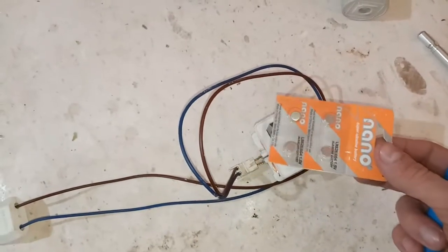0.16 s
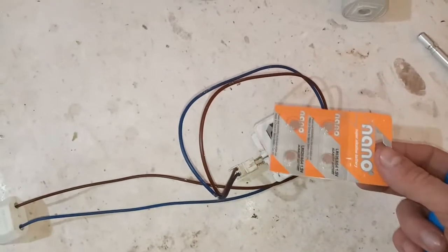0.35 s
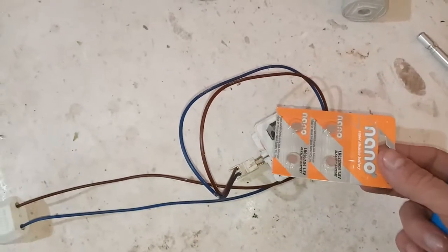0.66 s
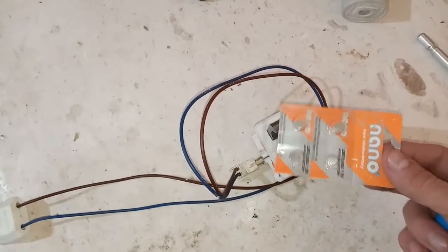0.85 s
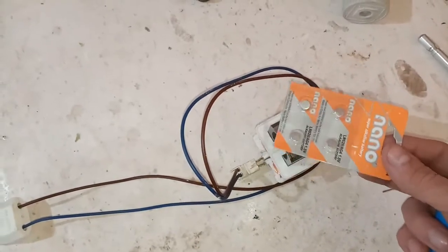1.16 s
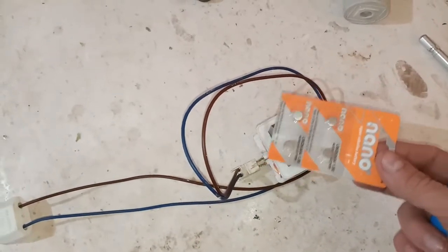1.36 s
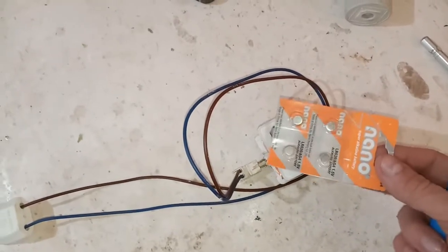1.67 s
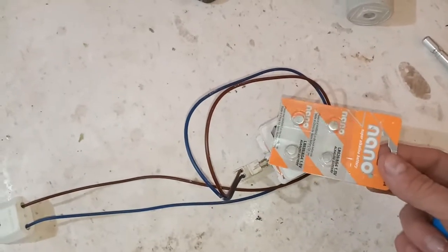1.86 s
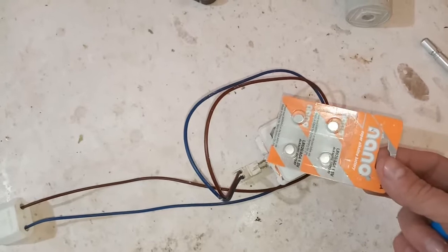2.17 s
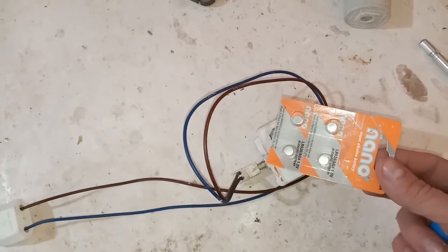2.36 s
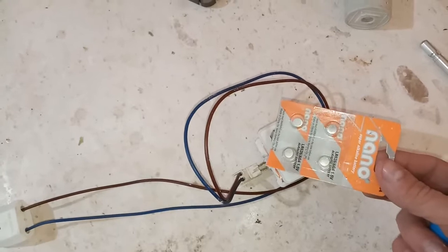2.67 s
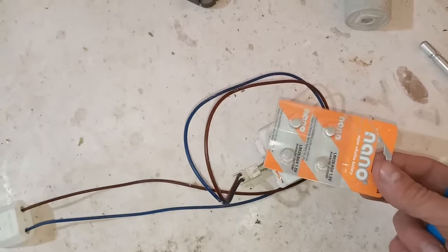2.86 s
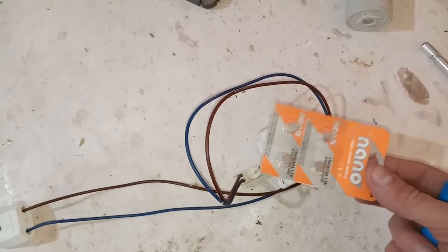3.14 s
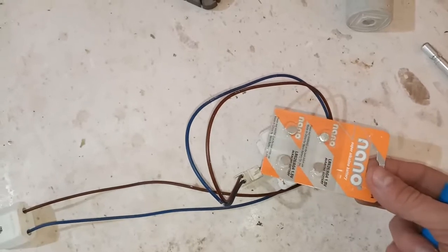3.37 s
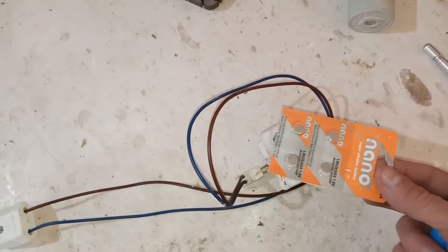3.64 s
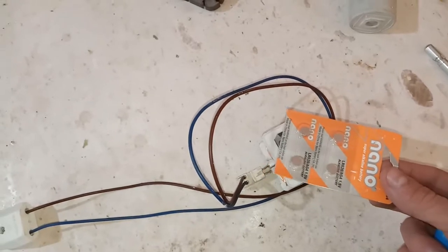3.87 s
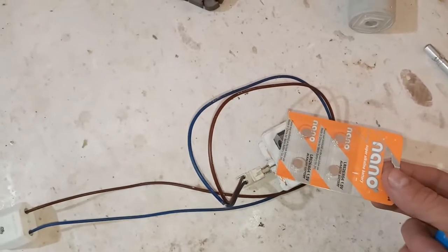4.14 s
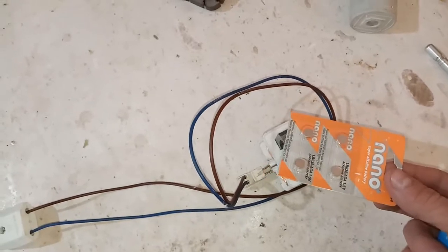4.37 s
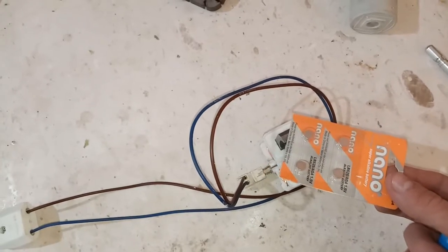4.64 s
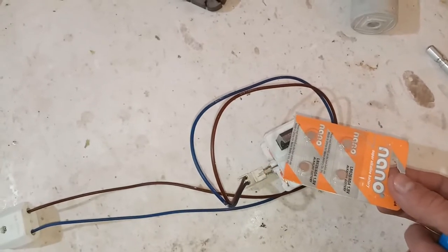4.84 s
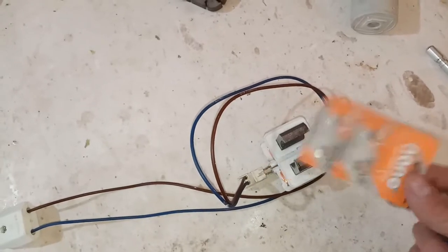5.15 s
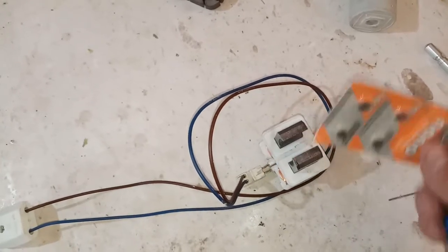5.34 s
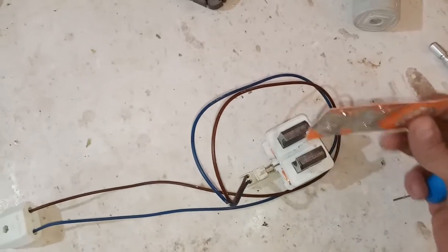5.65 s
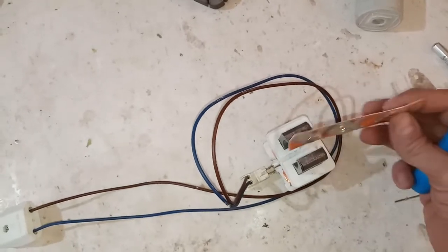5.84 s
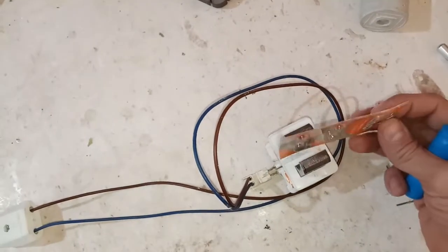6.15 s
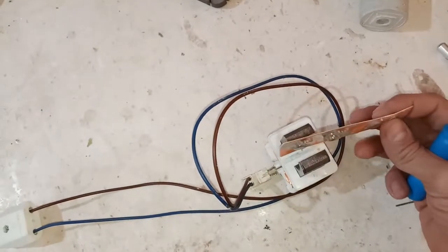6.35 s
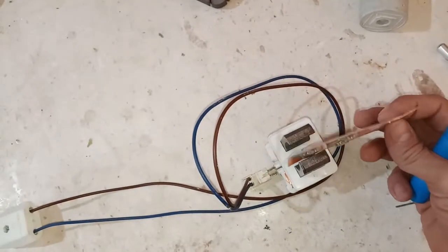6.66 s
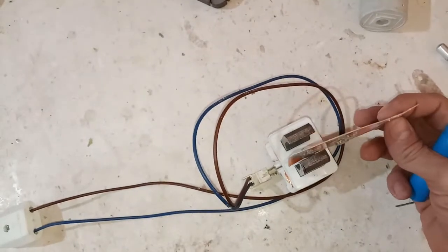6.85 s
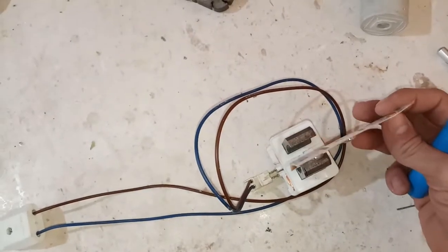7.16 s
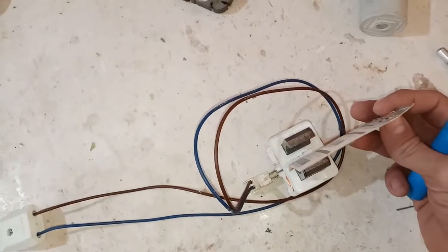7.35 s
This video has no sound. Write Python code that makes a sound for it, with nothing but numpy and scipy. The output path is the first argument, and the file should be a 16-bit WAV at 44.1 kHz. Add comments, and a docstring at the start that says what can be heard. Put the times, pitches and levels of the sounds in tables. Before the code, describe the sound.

Hard, fast electric rattling of a flat pack on a magnet core, broken by brief gaps, then near-quiet, a snap and a thinner steady buzz.

```python
"""A hard rattle, 100 slaps a second: a card pack with thin steel in it lies flat on a mains electromagnet.
Each tug of the field brings a slap on the core and bright ticks, ringing modes of pack and magnet.
It is lifted away, brushes the core, snaps onto it and then buzzes more thinly on its edge.
Contacts are short pushes with noisy flutter, filtered by resonances; hum and flexing add harmonics.
Behind lie small-room reflections, a thud of magnet and bench, a dull rumble and faint hiss."""
import sys
import numpy as np
from scipy import signal
from scipy.fft import rfft, irfft
from scipy.io import wavfile
from scipy.ndimage import uniform_filter1d

SR = 44100
rng = np.random.default_rng(int(sys.argv[2]) if len(sys.argv) > 2 else 0)


def transcribe(signal):
    """Save signal, clipped to [-1, 1], as a 16-bit WAV file at the path in sys.argv[1]."""
    frames = np.atleast_2d(signal).T
    limited = np.clip(frames, -1, 1)
    pcm = np.round(limited * 32767).astype(np.int16)
    wavfile.write(sys.argv[1], SR, pcm)


N = 331191

PULL_HZ = 100  # tugs of the field per second
TIME = np.arange(N) / SR  # s
BINS = np.fft.rfftfreq(8192, 1 / SR)  # Hz

# Ringing of the pack and the magnet: [f/Hz, width/Hz, lift/dB]
BODY_MODES = [(292, 11, 13), (602, 15.5, 7.5), (686.5, 29, 11.5), (1143, 37, 4), (1305, 110, 2.5),
              (1828, 12, 6), (2730, 170, 6.5), (3240, 93, 3), (4003, 30, 5), (6650, 130, 5),
              (7310, 110, 5.5), (8870, 72, 7), (10060, 140, -5)]
# Colour of one flat contact: [f/Hz, level/dB]
FLAT_COLOUR = [(100, -41), (230, -29.5), (380, -16.5), (480, -13.5), (650, -10.5), (850, -6.5),
               (1150, -0.5), (1750, 3.5), (2300, -5.5), (2550, -10), (3000, -5), (3600, 1), (4100, -2.5),
               (4400, -7.5), (5300, -9), (5750, -3), (7400, -5), (8100, -6.5), (10200, -12.5), (12800, -31),
               (16000, -36.5)]
# Two main resonances of the flat pack, shifting as it is pressed and bent:
# [t/s, lower f/Hz, upper f/Hz, gain of the upper/dB]
FLAT_RESONANCES = [(0.0, 1590, 6640, -9), (0.25, 1670, 7140, -7), (0.65, 1850, 6500, -21.5),
                   (1.35, 1840, 6950, -2), (1.6, 1660, 6800, 4), (2.0, 1680, 6500, -13),
                   (2.351, 1680, 6770, -6), (2.69, 1830, 7000, -19), (3.501, 1720, 6300, -11.5),
                   (3.92, 1600, 6700, -17.5), (4.22, 1750, 6700, 12), (4.55, 1660, 6400, 2),
                   (5.051, 1630, 5800, 1)]
# Resonances that ring only while the pack lies in one way: [start t/s, end t/s, f/Hz, gain/dB]
LYING_RESONANCES = [(0.049, 0.62, 3640, 1), (1.903, 2.7, 4850, -3), (3.75, 4.12, 9200, -10.5)]
# The pack is lowered onto the core and eased off, one curve per pass: [t/s, slap level/dB]
FLAT_PASSES = [
    [(0.0, -35), (0.032, -32), (0.588, -32.5), (0.616, -33.5), (0.652, -37), (0.66, -34.5), (0.85, -43.5)],
    [(0.87, -32), (0.872, -31.5), (1.004, -35.5), (1.088, -37), (1.222, -31.5), (1.326, -33.5), (1.6, -45)],
    [(1.68, -43), (1.752, -35.5), (1.94, -31), (1.944, -33.5), (1.982, -33.5), (2.492, -32), (2.5, -32)],
    [(2.52, -38.5), (2.55, -33.5), (2.69, -43), (2.7, -33.5), (2.72, -38), (2.74, -54)],
    [(2.98, -73), (3.048, -31), (3.07, -72), (3.084, -38.5), (3.192, -38.5), (3.264, -44.5), (3.345, -44)],
    [(3.37, -36), (3.464, -36.5), (3.78, -30.5), (3.984, -31), (4.06, -33.5), (4.552, -34.5), (4.69, -46)],
]
# Pulled away, the pack is caught again in short bursts: [start t/s, end t/s, slap level/dB]
CATCHES = [(4.738, 4.832, -40.5), (4.827, 4.825, -45.5), (4.886, 4.924, -39), (4.995, 5.003, -38.5)]
# Relative treble of the flat rattle: [t/s, chatter level/dB, finest ticks level/dB]
FLAT_TREBLE = [(0, -2.5, -2.5), (.5, -1.5, 0.5), (.7, -1.5, -7.5), (.92, -2.5, 2), (1.1, -4, -6),
               (1.27, -2.5, 2), (1.4, -3.5, -8), (1.65, 4, -1), (1.77, -4.5, -3.5), (2.08, -3, 3),
               (2.35, -6.5, -2.5), (2.75, 4, 8), (2.95, -7, -7.5), (3.28, -6.5, -11), (3.45, 0, -6),
               (3.801, -3.5, 0.5), (4.12, 1, 2.5), (4.55, 0, -6), (4.7, -2.5, -6.5)]
# The low end of the flat rattle thins or thickens for a while: [start t/s, end t/s, change/dB]
LOW_END_CHANGES = [(1.556, 1.68, -5), (2.956, 3.358, -17), (4.686, 4.757, 2.5)]
# Harder contacts are brighter; rows are heavy low end, slap, clack, chatter, finest ticks:
# [level re the slap level at the usual force/dB, gain per dB of slap level/dB]
FLAT_BRIGHTNESS = [(-15, 1.02), (-2.22, 1), (-6, 1.28), (1, 1.5), (-10, 1.27)]


def flat_rattle(clack_share=0.32, locked_ms=0.31):
    """Forced impact oscillation: each pull brings a slap, a loose corner's touch just before it,
    and a bright tick at its own delay."""
    slap_ms, rebound_ms, scatter_ms = swing()
    corner_ms = slap_ms - 2.1  # the loose corner touches first
    slap = strikes(slap_ms, scatter_ms, uneven_db=1.4, flutter=1.6, decay_ms=.9, rise_ms=.5)
    rebound = strikes(rebound_ms, scatter_ms + .1, uneven_db=2.2, flutter=1.5, decay_ms=.7, rise_ms=.5)
    loose = strikes(corner_ms, scatter_ms + 1.1, uneven_db=4, flutter=1.8, decay_ms=.8, rise_ms=.4)
    pull_s = np.arange(len(scatter_ms)) / PULL_HZ
    looseness = np.interp(TIME, pull_s, np.clip(scatter_ms / locked_ms, 0, 1))
    loose = amp(2.5) * loose * looseness  # a firmly locked pack chatters less

    lower_hz, upper_hz, upper_db = curves(FLAT_RESONANCES)
    slaps = slap + amp(-8) * rebound + amp(-6) * loose
    lower_gain = amp(-11 + 4 * waver(15))
    slaps = slaps + lower_gain * resonate(slaps, lower_hz + 70 * waver(15), width=160)

    chatter = rebound + amp(-6) * slap + amp(-5) * loose
    chatter = chatter + amp(upper_db) * resonate(chatter, upper_hz, width=1600)
    lying = np.zeros(N)
    for start, end, hz, db in LYING_RESONANCES:
        lying += amp(db) * during(start, end, fade_s=0.16) * resonate(chatter, np.full(N, hz), width=520)
    chatter = chatter + lying
    ticks = rebound + amp(-3) * slap + loose

    force = level(*np.vstack(FLAT_PASSES).T, fade=0.084)
    force = force + sum(burst(*row, rise_s=0.019, fall_db_per_s=321) for row in CATCHES)
    chatter_db, ticks_db = curves(FLAT_TREBLE)
    heavy_db = sum(db * during(start, end, fade_s=0.055) for start, end, db in LOW_END_CHANGES)
    colour_db = [heavy_db, 0, clack_share * chatter_db, chatter_db, ticks_db]
    gain = body(FLAT_COLOUR, BODY_MODES)
    return radiate(slaps, chatter, ticks, force, FLAT_BRIGHTNESS, -35, colour_db, gain, heavy_hz=890)


# Colour of one edge contact: [f/Hz, level/dB]
EDGE_COLOUR = [(40, -86), (100, -21), (300, -13), (650, -16), (930, -15.5), (1150, 4), (1550, 4),
               (2000, 6.5), (3200, -5.5), (4300, -0.5), (5200, -1), (6800, 2), (10000, -5.5), (13000, -29)]
# Two resonances of the pack on its edge, shifting with the grip: [t/s, lower f/Hz, upper f/Hz]
EDGE_RESONANCES = [(5.7, 1160, 2000), (5.88, 1250, 2100), (6.06, 1310, 2100), (6.2, 1390, 2150),
                   (6.34, 1295, 2150), (6.65, 1270, 2150), (6.9, 1210, 2230)]
# While the edge is pressed firmly: [start t/s, end t/s]
FIRM_PRESS = (6.94, 7.6)
# The edge stays on the core and is pressed harder: [t/s, slap level/dB]
EDGE_PRESS = [(6.54, -64), (6.674, -60.5), (6.972, -48.5), (7.002, -42.5), (7.052, -49), (7.136, -44.5),
              (7.45, -43), (7.464, -40.5), (7.51, -42.5)]
# Relative treble of the pressed edge: [t/s, level/dB]
EDGE_TREBLE = [(6.55, -2), (6.85, -2), (7.04, 0), (7.15, -1), (7.26, -1), (7.51, -7.5)]
# The edge brushes the core while the pack is turned:
# [start t/s, end t/s, slap level/dB, clack change/dB, chatter change/dB]
EDGE_BRUSHES = [(5.638, 5.717, -57, 5, 5), (5.92, 5.956, -72, -1, 9), (5.987, 6.2, -69.5, -17, -1.5),
                (6.212, 6.346, -60.5, 1, 0), (6.348, 6.426, -73.5, 1, 0)]
# Harder contacts are brighter; rows are heavy low end, slap, clack, chatter, finest ticks:
# [level re the slap level at the usual force/dB, gain per dB of slap level/dB]
EDGE_BRIGHTNESS = [(-13.5, 1.34), (-6, 0.79), (2, 1.37), (10, 1.48), (-1, 1.78)]


def edge_buzz(clack_share=0.14):
    """Impact oscillation of a stiff edge: crisp regular strikes, with lesser contacts at their own delays."""
    slap_ms, rebound_ms, scatter_ms = swing()
    bounce_ms = rebound_ms + 2.5
    slap = strikes(slap_ms, scatter_ms, uneven_db=1.2, flutter=1.7, decay_ms=1.3, rise_ms=.5)
    rebound = strikes(rebound_ms, scatter_ms + .1, uneven_db=1.5, flutter=1.5, decay_ms=1.1, rise_ms=.3)
    bounce = strikes(bounce_ms, scatter_ms + .7, uneven_db=6.0, flutter=1.8, decay_ms=.8, rise_ms=.4)
    slaps = slap + amp(-11) * bounce
    chatter = rebound + amp(-6) * slap + amp(-7) * bounce

    free = 1 - during(*FIRM_PRESS, fade_s=0.27)  # pressing damps the resonances
    ringing = np.zeros(N)
    for hz in curves(EDGE_RESONANCES):
        ringing += amp(4 * waver(14)) * resonate(slaps, hz + 80 * waver(11), width=55)
    slaps = slaps + amp(9) * free * ringing

    force = level(*np.transpose(EDGE_PRESS), fade=.06)
    chatter_db = np.interp(TIME, *np.transpose(EDGE_TREBLE), left=0)
    clack_db = clack_share * chatter_db
    for start, end, db, clack, bright in EDGE_BRUSHES:
        force = force + burst(start, end, db, rise_s=0.012, fall_db_per_s=330)
        touching = during(start, end, fade_s=0.014)
        clack_db = clack_db + clack * touching
        chatter_db = chatter_db + bright * touching
    colour_db = [0, 0, clack_db, chatter_db, chatter_db]
    gain = body(EDGE_COLOUR, BODY_MODES)
    return radiate(slaps, chatter, chatter, force, EDGE_BRIGHTNESS, -53, colour_db, gain, heavy_hz=770)


# Contacts come earlier or later in each pull as the gap changes; held still, the pack locks:
# [t/s, slap delay after the pull/ms, rebound delay after the pull/ms, timing scatter/ms]
CONTACT_TIMING = [(0.0, 2.84, 3.44, 0.63), (0.099, 6.35, 2.36, 0.31), (0.32, 7.4, 2.16, 0.19),
                  (0.61, 7.6, 1.67, 0.24), (0.68, 9.3, 1.5, 0.58), (0.76, 4.4, 4.3, 0.46),
                  (0.859, 3.75, 4.3, 0.42), (0.899, 8, 7.2, 0.43), (1.079, 6.24, 5.4, 0.26),
                  (1.219, 7.6, 6.5, 0.37), (1.308, 2.9, 3.7, 0.35), (1.418, 0.93, 4.2, 0.57),
                  (1.501, 5.3, 6, 0.43), (1.659, 4.2, 4.2, 0.16), (1.729, 2.05, 5.2, 0.48),
                  (1.849, 3.67, 4.3, 0.48), (1.919, 6.5, 4, 0.64), (2.02, 5.3, 2.6, 0.18),
                  (2.148, 5.3, 2.8, 0.28), (2.3, 4.24, 3.7, 0.28), (2.5, 7, 5.7, 0.64),
                  (2.72, 6.8, 4.9, 0.91), (3.0, 6.2, 5.1, 0.29), (3.071, 4.9, 4.35, 0.17),
                  (3.32, 6, 6.7, 0.12), (3.4, 8.5, 8.7, 0.45), (3.47, 11, 3.1, 0.45),
                  (3.602, 9.6, 3.4, 0.47), (3.699, 5.85, 3.4, .5), (3.882, 7.54, 3.03, 0.24),
                  (4.051, 6.9, 3.9, 0.26), (4.3, 7.4, 4.34, .1), (4.549, 8, 4.4, .2),
                  (4.68, 2.47, 4.04, 0.37), (4.798, 6.7, 6, 0.62), (5.029, 11, 9, 0.74),
                  (5.701, 10.2, 9.9, 1.18), (5.961, 6.5, 5.7, .3), (6.15, 6.1, 5.6, 0.42),
                  (6.258, 6.6, 7.3, 0.61), (6.43, 5.2, 6.5, 0.85), (6.55, 0.48, 0.34, 0.22),
                  (6.728, 1.1, 0.7, 0.19), (6.85, 5, 6.6, 0.43), (7.0, 4.6, 4.9, 0.084),
                  (7.101, 4.06, 3.55, 0.14), (7.199, 5.14, 5.9, .1), (7.51, 5.9, 5, 0.088)]


def swing(wander_share=.9):
    """Phase of impact in a forced oscillation: delays (ms) per pull, wandering more when looser."""
    slap_ms, rebound_ms, scatter_ms = curves(CONTACT_TIMING)
    wander = wander_share * scatter_ms * waver(12)
    return np.array([slap_ms + wander, rebound_ms + wander, scatter_ms])[:, ::SR // PULL_HZ]


def strikes(delay_ms, scatter_ms, uneven_db, flutter, decay_ms, rise_ms):
    """Periodic forcing with jitter: one contact in every pull, uneven in time and strength."""
    pull_s = np.arange(len(delay_ms)) / PULL_HZ
    late, strong = rng.standard_normal((len(pull_s), 2)).T
    s = pull_s + (delay_ms - rise_ms + scatter_ms * late) / 1000
    size = amp(uneven_db * np.clip(strong, -2, 1.5))
    return contacts(s, size, flutter, decay_ms, rise_ms, drift=25, spread=2.5, count=240, even=.65)


def contacts(s, size, flutter, decay_ms, rise_ms, drift=9, spread=.8, count=24, even=0):
    """Impact excitation: a push plus a short flutter of the spot, which drifts as the hand moves.
    With even near one, all spots share the same broad colour and strength."""
    t_ms = np.arange(SR // 50) * 1000 / SR
    spot = np.round(drift * s + spread * rng.standard_normal(len(s))).astype(int) % count
    envelope = np.exp(-t_ms / decay_ms) * (1 - np.exp(-t_ms / rise_ms))
    shapes = rng.standard_normal((count, len(t_ms))) * envelope
    shapes *= flutter / np.linalg.norm(shapes, axis=1, keepdims=True)
    shapes[:, round(rise_ms * SR / 1000)] += 1  # the push
    spectra = rfft(shapes / np.hypot(1, flutter))
    broad_power = uniform_filter1d(abs(spectra) ** 2, size=24, axis=1)
    shapes = irfft(spectra / broad_power ** (even / 2))
    out = np.zeros(N + 2 * len(t_ms))
    starts = np.clip(np.round(s * SR).astype(int), 0, N)
    for i, k, a in zip(starts, spot, size):
        out[i:i + len(t_ms)] += a * shapes[k]
    return out[:N]


def radiate(slaps, chatter, ticks, force, laws, usual_db, colour_db, gain, heavy_hz):
    """Modal excitation: broad slaps drive low modes; smaller, harder contacts ring higher ones."""
    bands = [(250, 900), (900, 2400), (2400, 5400), (5400, 10000), (10000, 16000)]  # Hz
    limits = [below(hz, order=5) for hz in (heavy_hz, 2400, 5200, 10000)] + [np.ones(len(BINS))]
    drives = [slaps, slaps, slaps + chatter, chatter, ticks]
    relative_force = force / amp(usual_db)
    out = np.zeros(N)
    for drive, band, limit, (lift_db, growth), tint_db in zip(drives, bands, limits, laws, colour_db):
        ringing = steady(ring(drive, gain * limit), band)
        out += ringing * amp(usual_db + lift_db + tint_db) * relative_force ** growth
        gain = gain * np.sqrt(1 - limit ** 2)  # what is left for the higher bands
    return out


# Single knocks of the flat pack on the core: [t/s, level before the group gain/dB, low-end lift/dB]
FLAT_KNOCKS = [(0.863, -24, 7), (1.045, -25.5, 5), (2.468, -15.5, 6), (2.547, -17.5, 15.5),
               (2.567, -14, 10.5), (2.577, -20, 10), (2.605, -16, 7), (2.632, -15, 3), (2.658, -17.5, -4),
               (2.668, -18.5, 2), (2.698, -15, 2), (2.716, -18, 17), (3.042, -18, 3), (3.054, -36, 6),
               (3.085, -26, 5), (3.334, -31, 0), (3.368, -33.5, -3), (4.703, -27, 7), (4.724, -31, 0)]
# The edge clicking against the core: [t/s, level before the group gain/dB, low-end lift/dB]
EDGE_CLICKS = [(2.834, -34, 7), (5.07, -35.5, -3), (5.091, -22.5, -2.5), (5.102, -30, -9), (5.124, -36, 12),
               (5.639, -26, -14), (5.689, -24, -1.5), (6.218, -33, -16), (6.341, -30.5, -6),
               (6.463, -14.5, -14.5), (6.466, -17, -6.5), (6.474, -25, -15), (6.484, -35, 6),
               (6.495, -24, -10), (6.521, -37, 7), (6.695, -41, -6)]
# Sharp ticks of a corner on the core as the pack tilts: [t/s, level before the group gain/dB]
CORNER_TICKS = [(1.4745, -21), (1.4865, -18), (1.5062, -21), (1.5835, -23), (1.6245, -20), (1.6545, -14.5),
                (1.6745, -22), (2.997, -39), (4.555, -21), (4.564, -21), (4.608, -19), (4.614, -25),
                (4.826, -17), (4.918, -28), (4.938, -23), (6.205, -48), (6.229, -27), (6.267, -34),
                (6.287, -35)]
# Colour of a corner tick: [f/Hz, level/dB]
TICK_COLOUR = [(500, -33), (1500, -11), (3500, -3), (5000, -5), (7000, 5), (10000, -6), (12500, -14),
               (16000, -21.5)]


def knocks(rows, colour, gain_db, flutter, decay_ms, low_hz):
    """Impulse response: single hard contacts ring the same modes, some with more low end."""
    gain, low = body(colour, BODY_MODES), below(low_hz, order=2)
    out = np.zeros(N)
    for s, db, *low_db in rows:
        blow = contacts(np.zeros(1), [1], flutter, decay_ms, rise_ms=0.22, count=1)[:len(BINS)]
        blow = ring(blow, gain * amp(sum(low_db) * low))
        part = out[round(s * SR):][:len(blow)]  # a view into out
        part += amp(db + gain_db) * blow[:len(part)] / np.linalg.norm(blow)
    return out


# Clean hum of the bending pack: [t/s, bending level/dB]
HUM_LEVEL = [(6.86, -67), (6.95, -59), (7.1, -50.5), (7.42, -51), (7.51, -48.5)]
# Each partial grows at its own rate as the pack bends harder, most of them faster than the first:
# [multiple of the pull, level re the usual bending level/dB, gain per dB of bending level/dB]
HUM_PARTIALS = [(1, -18.5, .6), (3, -3, 1.7), (4, -8, 2), (5, -9.5, 0.5), (6, -4, 2.2), (7, -8.5, 2.2)]


def hum(usual_db=-50):
    """Nonlinear forced vibration: on its edge the pack bends with the pull and sounds low harmonics."""
    bend = level(*np.transpose(HUM_LEVEL), fade=0.05) / amp(usual_db)
    out = np.zeros(N)
    for k, db, growth in HUM_PARTIALS:
        phase = 2 * np.pi * (k * PULL_HZ * TIME + rng.random()) + .3 * waver(22)
        tone = np.sqrt(2) * amp(1.2 * waver(25)) * np.cos(phase)
        out += amp(usual_db + db) * bend ** growth * tone
    return out


# Brief low tones of the flexing pack: [start t/s, end t/s, multiple of the pull, peak level/dB]
FLEX_TONES = [(0.26, 0.56, 1, -59), (1.27, 1.48, 2, -63.5), (1.25, 1.46, 3, -56), (1.23, 1.42, 4, -56),
              (1.8, 2.7, 4, -62), (1.85, 2.75, 3, -61), (1.9, 2.7, 5, -58), (0.11, 0.78, 3, -61.5),
              (3.12, 3.24, 3, -61), (3.4, 4.6, 4, -65)]


def flexes(edge_db=9):
    """Harmonic response: flexing freely, the pack lets one low harmonic swell, tremble and fade."""
    out = np.zeros(N)
    for start, end, k, db in FLEX_TONES:
        phase = 2 * np.pi * k * PULL_HZ * TIME + .7 * waver(22)
        tone = np.sqrt(2) * amp(2.5 * waver(30)) * np.cos(phase)
        swell = level([start, (start + end) / 2, end], [db - edge_db, db, db - edge_db], fade=0.063)
        out += swell * tone
    return out


# Soft rustles of the pack in the fingers: [start t/s, level/dB]
RUSTLE_TIMES = [(5.196, -74), (5.335, -95), (5.372, -72), (5.56, -71), (5.85, -75), (5.885, -67.5)]
# Colour of a rustle: [f/Hz, level/dB]
RUSTLE_COLOUR = [(2000, -34), (4000, -20), (5500, 2), (7000, -4), (8800, 3), (12000, -29)]


def rustles(length_s=0.033, fall_db=12):
    """Friction noise: the fingers shift on the pack in short, soft puffs of high noise."""
    noise = ring(rng.standard_normal(N), body(RUSTLE_COLOUR))
    puffs = sum(level([s, s + length_s], [db, db - fall_db]) for s, db in RUSTLE_TIMES)
    return noise / noise.std() * puffs


# The edge landing on the core also shakes the magnet on the bench: [t/s, level/dB, t60/s]
THUDS = [(6.463, -51, 0.42), (6.958, -55, .5)]
# Colour of the thud: [f/Hz, level/dB]
THUD_COLOUR = [(100, -31), (200, -8), (300, 9), (480, -1), (620, -2), (900, -5), (2000, -35)]


def thud():
    """Structure-borne decay: a short, dull ring of magnet and bench, as enveloped noise."""
    noise = steady(ring(rng.standard_normal(N), body(THUD_COLOUR)), (200, 900))
    return noise * sum(level([s, s + t60], [db, db - 60], fade=.003) for s, db, t60 in THUDS)


# Reverberation of the room: [f/Hz, t60/s]
ROOM_DECAY = [(200, 0.16), (700, 0.22), (1400, 0.24), (3700, 0.27), (7000, 0.24), (9700, 0.15),
              (16000, 0.077)]


def room(x, delay_s=0.0028, count=5):
    """Reverberation: sparse reflections, with decay set by frequency.
    Several random sets of reflections take turns from pull to pull, so the tail stays diffuse."""
    t = np.arange(SR // 2) / SR
    signs = rng.choice([-1., 1.], (count, len(t)))
    taps = signs * (rng.random((count, len(t))) < .1) * (t > delay_s)
    hz, t, z = signal.stft(taps, SR, nperseg=256)
    decay = amp(-60 * t / read(ROOM_DECAY, hz)[:, None])
    tails = signal.istft(z * decay, SR, nperseg=256)[1]
    tails /= np.linalg.norm(tails, axis=1, keepdims=True)
    apart = (PULL_HZ * TIME - np.arange(count)[:, None] + 1) % count - 1
    feeds = x * np.cos(np.pi / 2 * np.minimum(abs(apart), 1))  # overlapping windows, constant total power
    return signal.oaconvolve(feeds, tails, axes=1).sum(0)[:N]


# Resonances of the rumble: [f/Hz, width/Hz, lift/dB]
RUMBLE_MODES = [(112.8, 1.4, 28.5), (155, 10, 17), (213.7, 60, 14)]
# Colour of the rumble: [f/Hz, level/dB]
RUMBLE_COLOUR = [(25, -24.5), (82, -20), (108, 1), (180, -1.5), (255, -18.5), (500, -36.5), (2000, -60.5)]
# Swells of the rumble: [start t/s, end t/s, level/dB]
RUMBLE_SWELLS = [(1.149, 1.35, -68), (1.796, 1.917, -67), (2.693, 2.794, -59.5), (2.9, 3.01, -63),
                 (3.137, 3.22, -61.5), (3.594, 3.68, -68), (4.92, 4.98, -66), (5.13, 5.247, -66),
                 (5.74, 5.813, -61.5), (6.146, 6.427, -62), (6.657, 6.8, -61), (7.253, 7.51, -62)]
# Colour of the handling drone: [f/Hz, level/dB]
DRONE_COLOUR = [(100, -32), (240, -24), (305, -2.5), (360, -12.5), (440, -37), (1000, -43)]
# Soft drones while the pack is turned in the hand: [start t/s, end t/s, level/dB]
HAND_TURNS = [(5.687, 5.81, -62), (5.912, 5.916, -62), (6.064, 6.43, -67), (6.733, 6.964, -62)]
# Colour of the faint hiss: [f/Hz, level/dB]
HISS_COLOUR = [(30, -19), (80, -1), (250, -8), (500, -21), (900, -24.5), (1250, -16.5), (1800, -14.5),
               (2150, -12), (2450, -26), (3000, -31), (4500, -34.5), (6000, -33), (9000, -29),
               (12000, -43.5)]
# Faint ringing in the hiss: [f/Hz, width/Hz, lift/dB]
HISS_MODES = [(1220, 95, 8), (1640, 140, 7), (2074, 150, 11.5)]


def background(rise_s=0.041, fall_db_per_s=250):
    """Filtered noise: a dull rumble that swells, a drone as the hand turns, faint flickering hiss."""
    a, b, c = rng.standard_normal((3, N))
    rumble = steady(ring(a, body(RUMBLE_COLOUR, RUMBLE_MODES)), (90, 180), size=4000)
    drone = steady(ring(b, body(DRONE_COLOUR) * below(2000, order=2)), (260, 400), size=4000)
    hiss = patchy(ring(c, body(HISS_COLOUR, HISS_MODES)), depth_db=5)
    hiss = steady(hiss, (400, 16000), size=SR)
    swells = sum(burst(*row, rise_s, fall_db_per_s) for row in RUMBLE_SWELLS)
    turns = sum(burst(*row, rise_s, fall_db_per_s) for row in HAND_TURNS)
    floor = amp(-76 + 3.5 * waver(11))  # usual rumble level and its random drift
    return rumble * np.maximum(swells, floor) + drone * turns + amp(-76) * hiss


def amp(db):
    """Logarithmic level: decibels to gain."""
    return 10 ** (np.asarray(db) / 20)


def curves(table):
    """Linear interpolation: each column after the first as a curve over time."""
    s, *columns = np.transpose(table)
    return [np.interp(TIME, s, column) for column in columns]


def read(points, hz):
    """Logarithmic pitch scale: a spectrum table interpolated on a log-frequency axis."""
    f, value = np.transpose(points)
    return np.interp(np.log(hz + 1), np.log(f), value)


def level(s, db, fade=0.0039):
    """Amplitude envelope: gain that follows a dB curve and fades to silence outside it."""
    gate = np.interp(TIME, [s[0] - fade, s[0], s[-1], s[-1] + fade], [0, 1, 1, 0])
    return amp(np.interp(TIME, s, db)) * gate


def burst(start, end, db, rise_s, fall_db_per_s):
    """Exponential decay: gain that rises, holds from start to end and dies away."""
    rise = np.clip((TIME - start) / rise_s + 1, 0, 1)
    return rise * amp(db - fall_db_per_s * np.maximum(TIME - end, 0))


def during(start, end, fade_s):
    """Gating: one from start to end, fading to zero on both sides."""
    return np.clip(1 + np.minimum(TIME - start, end - TIME) / fade_s, 0, 1)


def waver(per_s):
    """Random modulation: a slow curve through random knots of unit spread."""
    knots = np.arange(0, N / SR + 1, 1 / per_s)
    return np.interp(TIME, knots, rng.standard_normal(len(knots)))


def body(colour, modes=()):
    """Frequency response: a broad colour with resonance peaks on it."""
    peaks_db = sum(db / (1 + (2 * (BINS - hz) / width) ** 2) for hz, width, db in modes)
    return amp(read(colour, BINS) + peaks_db)


def below(hz, order):
    """Low-pass response: smooth gain; what it leaves out is sqrt(1 - gain^2)."""
    return 1 / np.sqrt(1 + (BINS / hz) ** (2 * order))


def ring(x, gain):
    """Minimum-phase filtering: a causal response with sharp attack and ringing afterwards."""
    log_gain = np.log(np.maximum(np.r_[gain, gain[-2:0:-1]], 1e-5))
    response = np.fft.ifft(np.exp(np.conj(signal.hilbert(log_gain)))).real
    return signal.oaconvolve(x, response[:len(BINS)])[:len(x)]


def resonate(x, hz, width):
    """Time-varying resonance: a peak of gain one that follows the curve hz."""
    turn = np.exp(2j * np.pi * np.cumsum(hz) / SR)
    r = np.exp(-np.pi * width / SR)
    shifted = x / turn + 1e-18  # the offset avoids denormal numbers
    return 2 * (turn * signal.lfilter([1 - r], [1, -r], shifted)).real


def steady(x, band, size=2646):
    """Power normalisation: holds the running power inside a band (Hz) near one."""
    inside = signal.sosfilt(signal.butter(3, band, "band", fs=SR, output="sos"), x)
    power = uniform_filter1d(uniform_filter1d(inside ** 2, size), size // 2)
    return x / np.sqrt(np.abs(power) + 1e-14)


def patchy(x, depth_db):
    """Spectral modulation: noise flickers in small patches of time and frequency."""
    z = signal.stft(x, SR, nperseg=1024)[2]
    patches = uniform_filter1d(rng.standard_normal(z.shape), size=3, axis=0)
    patches = uniform_filter1d(patches, size=8, axis=1)
    return signal.istft(z * amp(depth_db * patches / patches.std()), SR, nperseg=1024)[1][:N]


def scene():
    """Superposition: the rattling pack close by, the room behind it."""
    pack = flat_rattle() + edge_buzz() + rustles()
    pack += knocks(FLAT_KNOCKS, FLAT_COLOUR, gain_db=12.5, flutter=3.5, decay_ms=1.5, low_hz=2500)
    pack += knocks(CORNER_TICKS, TICK_COLOUR, gain_db=7, flutter=1.1, decay_ms=.6, low_hz=2500)
    pack += knocks(EDGE_CLICKS, EDGE_COLOUR, gain_db=8.5, flutter=2.6, decay_ms=2.2, low_hz=2180)
    return (pack + amp(-8) * room(pack) + hum() + thud() + flexes() + background())[None]


def record(dry):
    """Band limiting: a linear-phase low-pass removes the highest treble."""
    low_pass = signal.firwin(401, 16250, window=("kaiser", 9), fs=SR)  # cutoff in Hz
    return signal.oaconvolve(dry, low_pass[None], "same")


dry = scene()
out = record(dry)
transcribe(out)
```